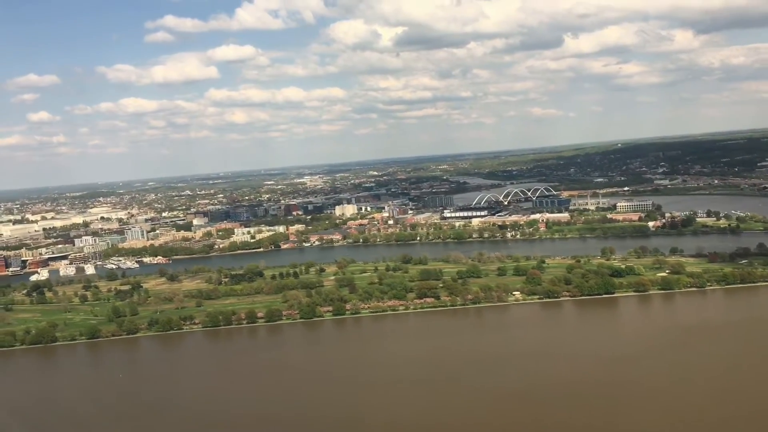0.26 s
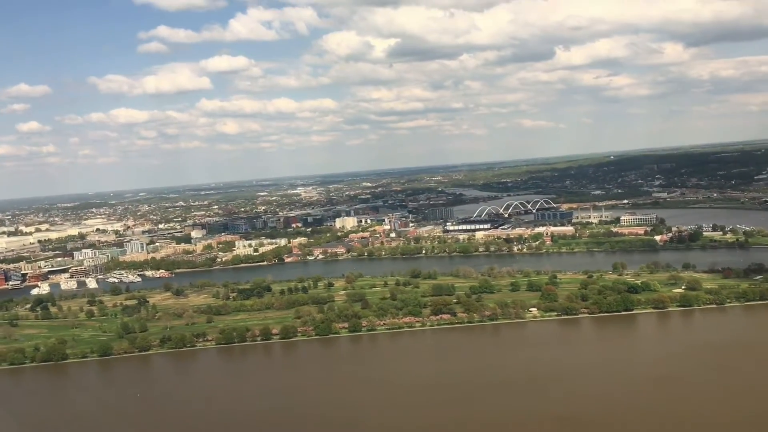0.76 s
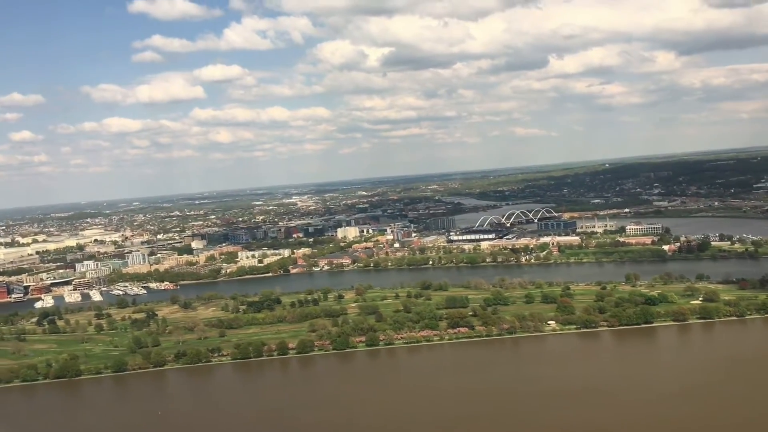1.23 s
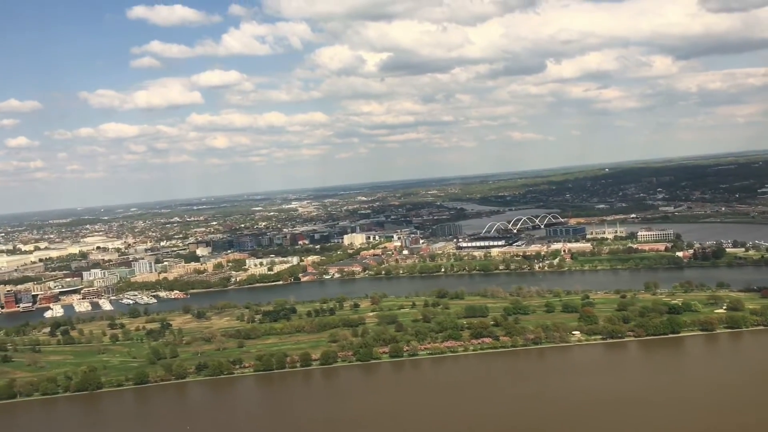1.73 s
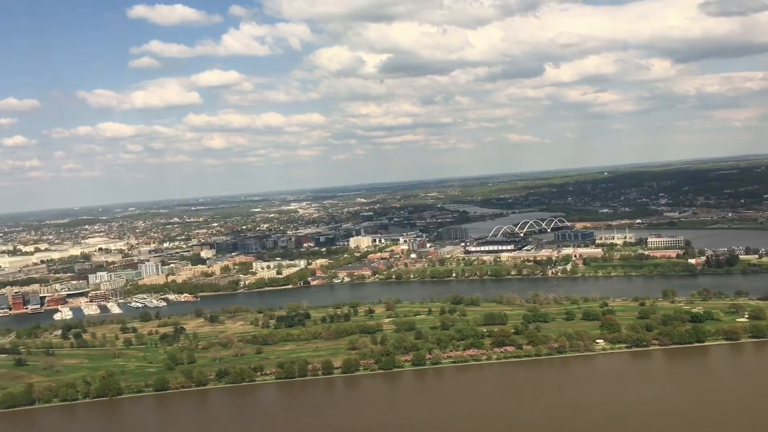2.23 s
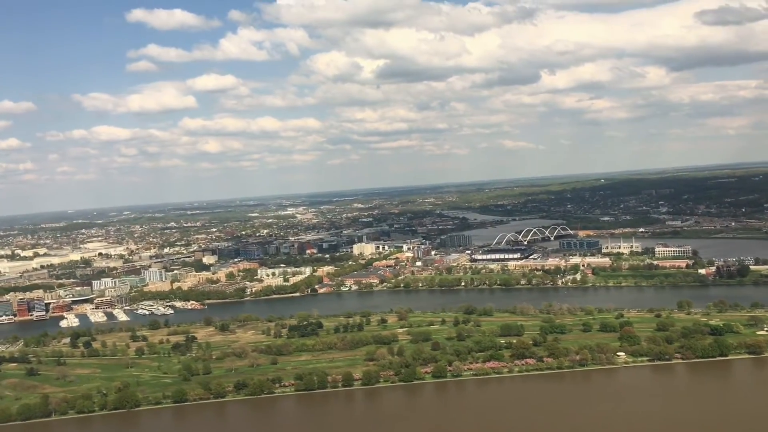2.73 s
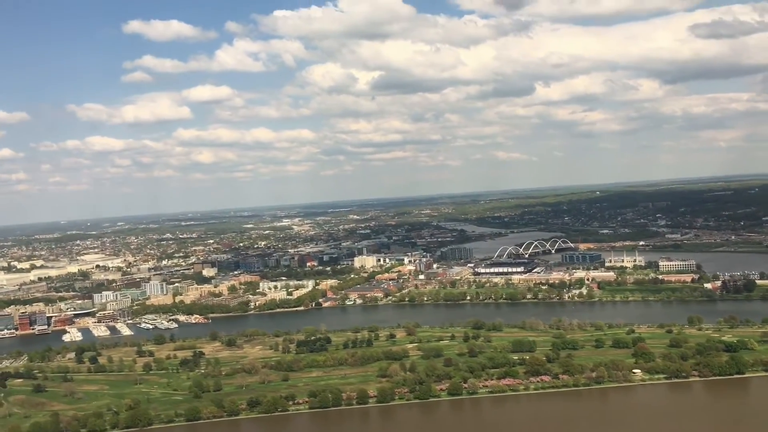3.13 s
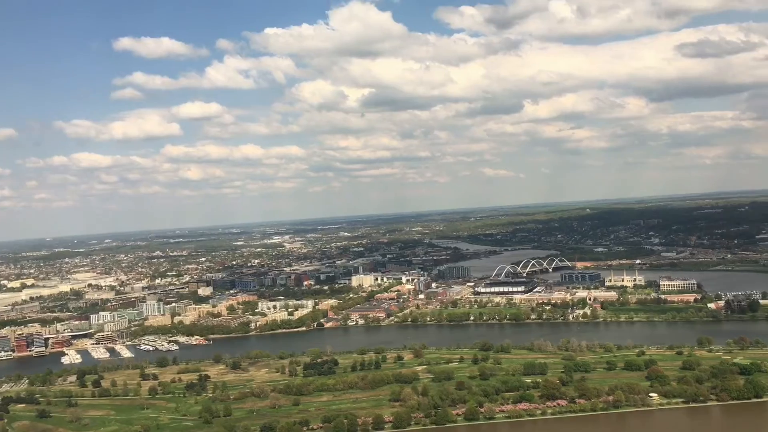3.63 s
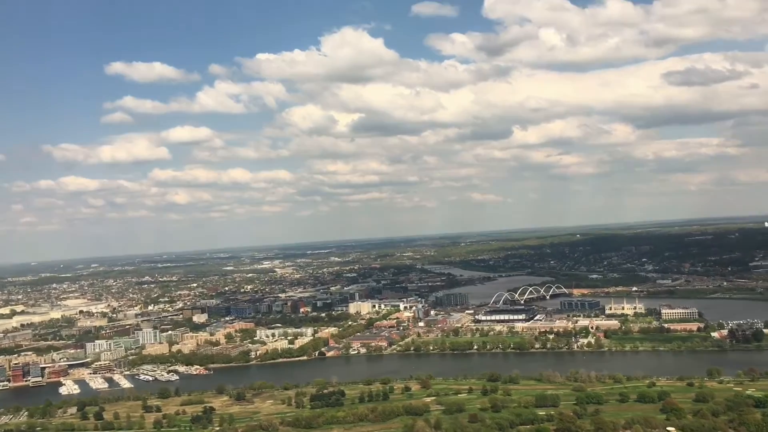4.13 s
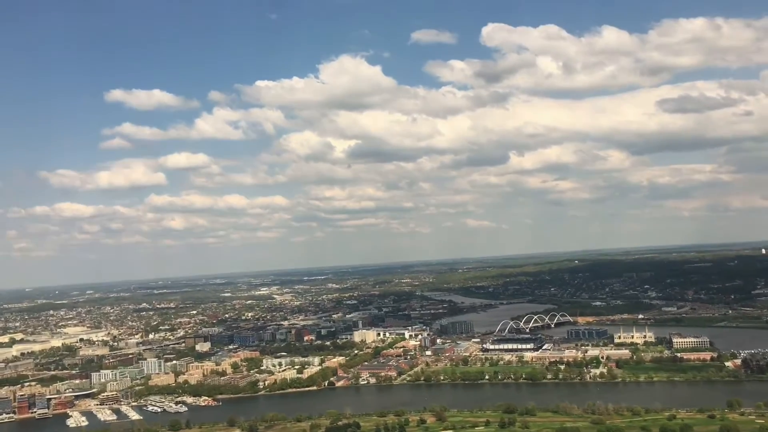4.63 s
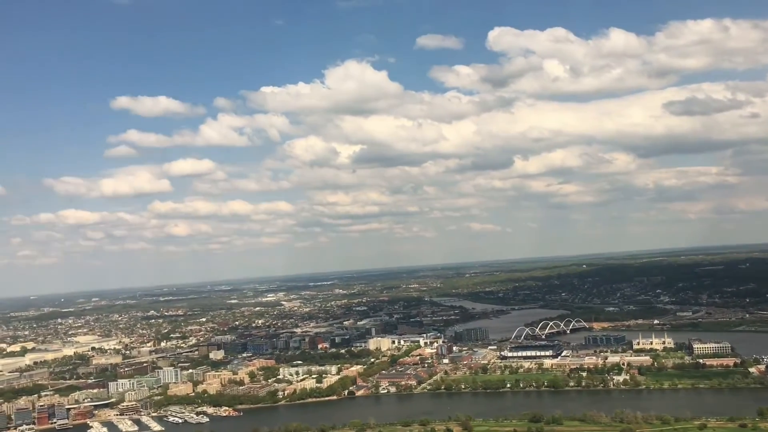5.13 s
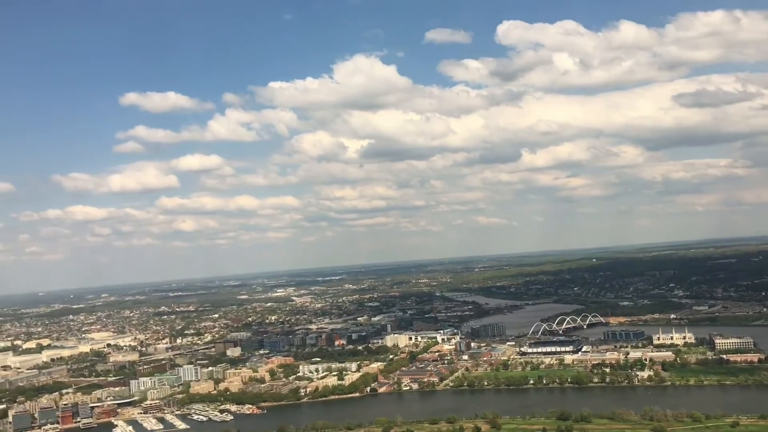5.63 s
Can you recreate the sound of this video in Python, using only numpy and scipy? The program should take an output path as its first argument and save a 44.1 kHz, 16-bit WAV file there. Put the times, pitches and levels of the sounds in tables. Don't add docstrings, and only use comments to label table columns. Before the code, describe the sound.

The inside of a jet airliner climbing at high power, captured by a phone held close to the window, high above a river and town. From 0 to nearly 6 seconds a heavy low rumble never stops; its boom and drone flutter in quick irregular surges and lulls. The cabin wall drums above it, with a dull, muffled roar of air and a much thinner hiss. A steady-pitched engine buzz, a coarse comb of low tones with faint higher ones, runs throughout, its parts fading in and out. Faint pump and duct whines and a throbbing window panel sit beneath. Airflow rises slightly at about 2 to 2.5 seconds and again near 5. Small, dry scuffs of a hand on the phone cluster around 2.0-2.3 seconds, come singly near 3.4, 3.7 and 4.2, then return at 4.9 and 5.2-5.4. The roar continues to the end.

```python
import sys
import numpy as np
from scipy import signal
from scipy.fft import rfft, irfft
from scipy.io import wavfile
from scipy.ndimage import uniform_filter1d

SR = 44100
rng = np.random.default_rng(int(sys.argv[2]) if len(sys.argv) > 2 else 0)


def convert_level_to_amplitude(level_db):
    exponent = np.asarray(level_db, float) / 20
    return 10 ** exponent


def store_pcm(level_fs):
    pcm = np.round(np.clip(level_fs, -1, 1) * 32767).astype(np.int16)
    wavfile.write(sys.argv[1], SR, np.atleast_2d(pcm).T)


N = 258426
SLOW_RATE = 50


def evened(x):
    return x / np.sqrt(np.mean(abs(x) ** 2) + 1e-20)


def curve(rows):
    times, values = np.transpose(rows)
    return np.interp(np.arange(N) / SR, times, values)


def noise(colour, size, patchy_db, flicker_db):
    frames = 4 * N // size + 5
    hz = np.fft.rfftfreq(size, 1 / SR)
    a, b, patches = rng.standard_normal((frames, len(hz), 3)).T
    patches = uniform_filter1d(patches, size=10, axis=0)
    patches = evened(uniform_filter1d(patches, size=20, axis=1))
    flicker = evened(uniform_filter1d(rng.standard_normal(frames), size=8))
    f, db = np.transpose(colour)
    shape_db = np.interp(np.log(hz + 1), np.log(f + 1), db, left=-120, right=-120)
    z = (a + 1j * b) * convert_level_to_amplitude(shape_db[:, None] + patchy_db * patches + flicker_db * flicker)
    sound = signal.istft(z, nperseg=size, noverlap=3 * size // 4)[1]
    return evened(sound[:N])


def surges(rest_db, rows, depth):
    t = np.arange(0, N, 64) / SR
    change_db = sum(db * np.exp(-((t - s) / half) ** 2) for s, half, db in rows)
    return np.interp(np.arange(N) / SR, t, convert_level_to_amplitude(rest_db + depth * change_db))


def calmed(x, size, share):
    power = evened(x) ** 2
    lumps = uniform_filter1d(uniform_filter1d(power, size=size), size=size)
    return evened(x / (abs(lumps) + .02) ** (share / 2))


# (frequency [Hz], level [dB per Hz])
RUMBLE_COLOUR = [(14, -61), (22, -32.5), (40, -5.5), (54, -3), (70, 5), (82, 1.5), (92, -3), (112, -1.5),
                 (135, -4.5), (155, -1), (175, -5.5), (192, -5.5), (215, -14), (260, -38.5)]
# (centre [s], half length [s], change [dB])
BOOM_SURGES = [(0.005, 0.025, 0), (0.095, 0.02, 4), (0.15, 0.03, -6.0), (0.26, 0.02, -11),
               (0.387, 0.05, 3.5), (0.474, 0.02, -4.5), (0.504, 0.02, 1), (0.589, 0.03, -5.0),
               (0.708, 0.023, -4.5), (0.753, 0.019, 6.5), (0.878, 0.05, -7.5), (1.106, 0.023, -11),
               (1.163, 0.015, 8), (1.325, 0.017, 5.5), (1.362, 0.02, -8), (1.472, 0.02, 1),
               (1.541, 0.03, 0), (1.643, 0.024, 5.5), (1.681, 0.02, -6), (1.771, 0.03, -13),
               (1.866, 0.02, 4.5), (2.028, 0.062, -5.0), (2.334, 0.035, 7), (2.565, 0.083, 2.5),
               (2.687, 0.03, -1.5), (2.798, 0.02, -9), (2.83, 0.02, 4.5), (2.873, 0.02, -9),
               (2.938, 0.02, 1.5), (2.973, 0.022, -4), (3.026, 0.02, 3.5), (3.128, 0.038, 1.5),
               (3.18, 0.023, -4), (3.282, 0.017, -6), (3.442, 0.019, 4.0), (3.507, 0.02, -4.5),
               (3.638, 0.032, -11), (3.771, 0.02, -7), (3.816, 0.02, 1), (3.907, 0.018, 2.5),
               (4.156, 0.03, -5), (4.255, 0.045, 5), (4.38, 0.02, 4.0), (4.43, 0.02, -7),
               (4.585, 0.018, 2.5), (4.649, 0.018, 5.5), (4.709, 0.035, -4), (4.774, 0.015, 6.5),
               (4.877, 0.02, 1.5), (4.913, 0.017, -3), (5.013, 0.013, 11.5), (5.133, 0.075, -7),
               (5.366, 0.03, -7), (5.478, 0.02, -9), (5.52, 0.022, 6), (5.816, 0.058, 4.5)]
# (centre [s], half length [s], change [dB])
DRONE_SURGES = [(0.01, 0.016, -4.5), (0.229, 0.02, 3.5), (0.349, 0.018, -2.5), (0.455, 0.02, -5),
                (0.5, 0.02, 4), (0.692, 0.02, -6.5), (0.84, 0.087, 2.5), (1.043, 0.027, 4.5),
                (1.122, 0.018, -3), (1.187, 0.033, -7), (1.272, 0.02, 3), (1.352, 0.039, -4),
                (1.467, 0.02, 3.5), (1.502, 0.02, -3.0), (1.63, 0.2, 2.0), (1.666, 0.016, -9),
                (1.792, 0.014, -9), (1.932, 0.02, -5), (2.09, 0.017, -5), (2.16, 0.015, -6.5),
                (2.28, 0.06, 2.5), (2.42, 0.026, 3), (2.484, 0.018, -2.5), (2.528, 0.021, 5.0),
                (2.562, 0.02, -8), (2.597, 0.024, 2), (2.644, 0.018, -3.5), (2.824, 0.077, 3),
                (2.895, 0.024, 4), (2.94, 0.02, -4.5), (3.013, 0.089, -3), (3.108, 0.017, 4),
                (3.342, 0.015, 4.5), (3.486, 0.036, -3), (3.732, 0.032, 3.5), (3.831, 0.019, 3.5),
                (3.936, 0.07, -2), (4.071, 0.04, 3.5), (4.172, 0.02, -2), (4.365, 0.02, 3),
                (4.394, 0.02, -7), (4.425, 0.054, -4), (4.718, 0.056, -3.5), (4.776, 0.017, 4),
                (4.799, 0.013, -6), (4.909, 0.025, -3), (5.004, 0.015, 3.5), (5.148, 0.018, -4.5),
                (5.187, 0.016, 4), (5.23, 0.03, -3), (5.286, 0.017, 5.5), (5.315, 0.014, -7),
                (5.347, 0.019, 5), (5.438, 0.027, 4), (5.483, 0.017, -4), (5.779, 0.02, 4.5)]
BOOM_REST_DB, DRONE_REST_DB = -17.5, -16.5


def rumble():
    low = noise(RUMBLE_COLOUR, size=8192, patchy_db=0.54, flicker_db=-2)
    boom_share = 1 / (1 + (np.fft.rfftfreq(N, 1 / SR) / 100) ** 12)
    boom = irfft(rfft(low) * boom_share, N)
    drone = calmed(low - boom, size=1400, share=0.93)
    boom = calmed(boom, size=1600, share=0.72)
    return (surges(BOOM_REST_DB, BOOM_SURGES, depth=1.27) * boom
            + surges(DRONE_REST_DB, DRONE_SURGES, depth=1.21) * drone)


# (frequency [Hz], level [dB per Hz])
DRUM_COLOUR = [(170, -34), (225, -3), (270, -1.5), (310, -8), (350, -5.5), (380, -11.5), (460, -10.5),
               (540, -49)]
# (centre [s], half length [s], change [dB])
DRUM_SURGES = [(0.246, 0.07, -4.5), (0.386, 0.015, 7), (0.72, 0.018, 0.5), (0.883, 0.02, 7),
               (0.938, 0.02, -8), (1.028, 0.02, -3.5), (1.088, 0.02, 2.5), (1.357, 0.045, -3),
               (1.468, 0.025, -7), (1.59, 0.017, -1), (1.655, 0.02, -3.5), (1.751, 0.022, 2),
               (2.093, 0.041, 6), (2.19, 0.02, 4), (2.275, 0.035, 4.5), (2.424, 0.03, 0),
               (2.614, 0.12, 2.5), (2.807, 0.045, -5), (2.957, 0.049, -4.5), (3.218, 0.027, -10),
               (3.298, 0.02, -4.0), (3.497, 0.02, -6), (3.57, 0.02, 4.0), (3.655, 0.03, -2.5),
               (3.796, 0.045, 0.5), (3.871, 0.037, 6.5), (3.951, 0.037, -4), (4.066, 0.026, -1),
               (4.174, 0.015, -3), (4.285, 0.022, -7), (4.34, 0.02, -2), (4.525, 0.017, 1),
               (4.81, 0.03, 3.5), (4.898, 0.02, 4.5), (4.994, 0.02, -7), (5.066, 0.033, 3.5),
               (5.192, 0.05, 2.5), (5.498, 0.02, -2), (5.642, 0.1, 2.0), (5.812, 0.033, -2.5)]
DRUM_REST_DB = -28.5


def wall_drumming():
    drum = noise(DRUM_COLOUR, size=4096, patchy_db=.5, flicker_db=-0.4)
    drum = calmed(drum, size=1600, share=0.43)
    return surges(DRUM_REST_DB, DRUM_SURGES, depth=0.73) * drum


# (time [s],
# level [dB])
NEARNESS = [(0.0, -0.5), (0.4, 0), (1.2, -0.5), (1.85, .5), (2.05, 2), (2.2, 2.5), (2.55, 2), (2.95, 0),
            (3.5, 1), (4.0, 1.5), (4.4, 1), (4.75, 1.5), (4.92, 3), (5.08, 2.5), (5.4, 2), (5.86, 1.5)]
# (frequency [Hz], level [dB per Hz])
ROAR_COLOUR = [(380, -27), (480, 2.5), (540, 1.5), (620, -4), (730, -8), (820, -4.5), (900, -8),
               (1050, -11.5), (1300, -12.5), (1500, -19.5), (1800, -15), (2150, -20), (2600, -52)]
# (frequency [Hz], level [dB per Hz])
HISS_COLOUR = [(1700, -16), (2300, -0.5), (2900, -3.5), (3200, -2), (4300, -5), (4800, -11.5), (6100, -7),
               (7000, -12), (7700, -16), (9900, -16), (10300, -23), (10800, -21.5), (11200, -18.5),
               (13500, -23.5), (15000, -26), (15800, -32)]
ROAR_DB, HISS_DB, HISS_FOLLOWS = -36.5, -50, 1


def airflow():
    near_db = curve(NEARNESS)
    roar = noise(ROAR_COLOUR, size=4096, patchy_db=.7, flicker_db=.2)
    hiss = noise(HISS_COLOUR, size=1024, patchy_db=.9, flicker_db=.15)
    return convert_level_to_amplitude(ROAR_DB + near_db) * roar + convert_level_to_amplitude(HISS_DB + HISS_FOLLOWS * near_db) * hiss


def ring(hz, width_hz):
    r = np.exp(-np.pi * width_hz / SR)
    kicks = rng.standard_normal(N) + 1j * rng.standard_normal(N)
    slow = signal.lfilter([1], [1, -2 * r, r * r], kicks)
    return evened((slow * np.exp(2j * np.pi * hz * np.arange(N) / SR)).real)


# (frequency [Hz], width [Hz], level [dB])
WHINES = [
    (1725, 24, -58),
    (2250, 16, -60),
    (2706, 10, -64),
    (2785, 20, -69),
    (1028, 10, -59),
    (3075, 70, -66),
    (6130, 40, -71),
    (8850, 260, -69),
    (266, 14, -37),
    (219, 8, -35),
]
# (centre [s], half length [s], change [dB])
PANEL_THROBS = [(0.1, 0.15, -6), (0.299, 0.033, 5.5), (0.544, 0.045, -4.0), (0.659, 0.045, 5.5),
                (0.943, 0.07, -5), (1.142, 0.03, -5), (1.277, 0.03, 4), (1.432, 0.07, -7),
                (1.711, 0.085, -8), (2.055, 0.045, 3), (2.145, 0.03, -3.0), (2.2, 0.25, 3.0),
                (2.24, 0.03, 5), (2.36, 0.1, -1.5), (2.509, 0.045, 3.0), (2.639, 0.03, 4),
                (2.868, 0.07, -3.0), (3.198, 0.025, 6), (3.312, 0.03, 1.5), (3.387, 0.03, -5.0),
                (3.771, 0.045, -3), (3.931, 0.033, 8), (4.041, 0.02, 7), (4.375, 0.092, -5),
                (4.754, 0.03, 3.5), (5.153, 0.03, -6), (5.293, 0.03, -7), (5.413, 0.045, 4.0),
                (5.527, 0.02, -6.5), (5.617, 0.25, 4)]
PANEL_HZ, PANEL_WIDTH_HZ, PANEL_DB, PANEL_DEPTH = 1206, 24.6, -49.5, 1.34


def whines():
    panel = calmed(ring(PANEL_HZ, PANEL_WIDTH_HZ), size=1500, share=0.87)
    panel = surges(PANEL_DB, PANEL_THROBS, PANEL_DEPTH) * panel
    return panel + sum(convert_level_to_amplitude(db) * ring(hz, width_hz) for hz, width_hz, db in WHINES)


# (time [s], peak level [dB], 60 dB decay time [s])
SLIPS = [(2.0194, -55, 0.13), (2.1011, -52.5, 0.14), (2.141, -50.5, 0.15), (2.156, -52, 0.2),
         (2.2094, -60, 0.15), (2.269, -57, 0.15), (3.3794, -54.5, 0.13), (3.7194, -52.5, 0.17),
         (4.2094, -52, 0.18), (4.8794, -55, 0.15), (4.9094, -59, 0.25), (4.945, -59, 0.2),
         (5.232, -54, 0.15), (5.3014, -54.5, 0.19), (5.3742, -46.5, 0.08), (5.41, -51, 0.14)]
# (frequency [Hz], level [dB per Hz])
SLIP_COLOUR = [(300, -13), (1000, -0.5), (3000, -3), (6000, -13), (9000, -14.5), (12000, -21.5),
               (16000, -24)]


def hand():
    t, power = np.arange(N) / SR, np.zeros(N)
    for s, db, t60 in SLIPS:
        age = np.maximum(t - s + 0.005, 0)
        rise = 1 - np.exp(-age / 0.0044)
        power += (convert_level_to_amplitude(db - 60 * age / t60) * rise) ** 2
    scuff = noise(SLIP_COLOUR, size=256, patchy_db=1, flicker_db=.4)
    roughness = evened(uniform_filter1d(rng.standard_normal(N), size=60))
    catch = evened(convert_level_to_amplitude(1.8 * roughness))
    return convert_level_to_amplitude(12.5) * np.sqrt(power) * scuff * catch


def drift(rate_hz, count):
    size = N * SLOW_RATE // SR + 2
    hz = np.fft.fftfreq(size, 1 / SLOW_RATE)
    z = rng.standard_normal((count, size)) + 1j * rng.standard_normal((count, size))
    z = np.fft.ifft(z * np.exp(-(hz / np.reshape(rate_hz, (-1, 1))) ** 2))
    return z / np.sqrt(np.mean(abs(z) ** 2, axis=1, keepdims=True))


def spread(slow):
    at, points = np.arange(N) * SLOW_RATE / SR, np.arange(len(slow))
    return np.interp(at, points, slow.real) + 1j * np.interp(at, points, slow.imag)


# (time [s], frequency [Hz])
SHAFT = [(0.0, 109.564), (0.49, 109.62), (0.98, 109.619), (1.46, 109.47), (1.95, 109.56), (2.44, 109.637),
         (2.93, 109.614), (3.42, 109.576), (3.91, 109.714), (4.4, 109.658), (4.88, 109.662),
         (5.37, 109.683), (5.86, 109.673)]
ORDER_DB = [-34.5, -38, -33, -41.5, -51, -55, -60, -57, -55, -62, -57, -70, -67, -69, -54, -73, -63, -75,
            -83, -66, -68, -67, -66, -82, -65, -56, -69, -72, -70, -71, -62, -77, -68, -64, -64, -69, -68,
            -69, -65, -74, -84, -79, -73, -72, -78, -79, -79, -77, -73, -73, -80, -78, -73, -67, -74, -78,
            -77, -83, -76, -79, -80, -79, -80, -90, -82, -80, -87, -90, -85, -87, -83, -86, -84, -85, -89,
            -84, -83, -82, -81, -93, -83, -83, -88, -89, -88, -89, -84, -85, -87, -93]
# (order, centre [s], half length [s], change [dB])
SWELLS = [(3, 4.0, 1.3, -11.3), (4, 3.2, 0.9, 3.8), (4, 5.8, 0.6, -8.3), (5, 0.9, 1.0, -4.5),
          (5, 3.45, 1.0, -9.5), (6, 3.5, 0.8, -10.7), (6, 5.2, 0.7, 3), (7, 5.2, 0.6, 4.5),
          (8, 5.4, 0.6, 6.0), (10, 4.4, 0.35, 4), (22, 1.6, 0.6, 7.5), (22, 4.4, 0.6, 10.2),
          (27, 1.3, 0.6, -10.3), (32, 2.9, 1.3, 5.7), (32, 5.5, 0.25, 10.9), (33, 3.3, 0.4, -10.2),
          (35, 1.5, 0.4, 8.4), (35, 4.3, 0.4, -13.4), (35, 4.3, 0.6, 21.8), (36, 2.2, 0.15, 7.2),
          (39, 3.4, 0.25, -9.9), (39, 3.4, 0.9, 7.6), (40, 1.7, 0.4, 8.7), (40, 4.4, 0.9, 6.7),
          (41, 3.2, 0.4, -8.7), (45, 1.0, 0.9, 7.2), (65, 5.6, 0.6, 7.3), (73, 2.8, 0.25, 11.0),
          (73, 5.5, 0.15, 13.0), (84, 5.8, 0.9, 10.6)]
# (order, centre [s], half length [s], change [dB])
FURTHER_SWELLS = [(3, 1.3, .2, -5), (3, 2.2, .35, 3), (4, 1.1, .3, 2.5), (4, 1.8, .25, -2), (4, .05, .2, -8),
                  (17, 3.5, .6, 3), (17, 2.2, .3, -3), (36, 4.2, .3, -8), (37, 2.1, .35, -6),
                  (56, 3.5, .2, -8), (7, 2.0, .2, -6), (7, 3.5, .5, -4), (5, 2.15, .25, 2), (6, .1, .5, -6),
                  (6, 2.5, .2, 3), (7, 2.43, .2, 4), (13, 4.97, .27, 5), (17, 5.7, .35, 4),
                  (25, 2.25, .12, 7), (33, 2.3, .12, 4), (91, 1.3, .3, 9), (36, 4.8, .3, 5.5),
                  (36, 3.5, .5, -5), (37, 3.4, .5, 3), (37, 4.4, .12, 5), (38, 4.2, .6, -6),
                  (68, 2.85, .35, 8), (65, 2.85, .3, 8), (41, 3.9, .15, 2), (46, 5.3, .4, 4),
                  (55, 4.1, .15, 6), (56, .7, 1.2, 3), (56, 5.2, .8, -7), (89, 4.17, .12, 12),
                  (90, 4.1, .2, 10), (90, 5.75, .15, 10)]
# (order, centre [s], half length [s], change [dB])
PASSING_SWELLS = [(13, 3.72, 0.6, -4.5), (19, 2.4, 0.4, -5.5), (19, 5.4, 0.15, 8.5), (24, 2.36, 0.25, 7.0),
                  (27, 0.36, 0.15, -7.0), (27, 5.72, 0.4, 5.0), (29, 0.32, 0.4, 6.5), (29, 1.24, 0.4, -5.5),
                  (29, 2.24, 0.25, 7.5), (31, 2.12, 0.15, 8.0), (31, 3.2, 0.25, 7.5), (32, 2.8, 0.25, -6.5),
                  (33, 4.72, 0.15, -8.0), (35, 0.92, 0.15, 10.0), (35, 5.48, 0.4, -4.5),
                  (36, 0.24, 0.15, -7.0), (39, 1.2, 0.15, -9.0), (39, 2.8, 0.25, 7.5),
                  (41, 0.52, 0.6, -6.0), (41, 1.6, 0.25, 9.5), (42, 2.44, 0.15, 10.0),
                  (42, 2.84, 0.15, -9.0), (44, 3.84, 0.15, 7.5), (45, 2.08, 0.15, -8.5),
                  (46, 3.8, 0.25, 9.0), (46, 4.48, 0.25, -9.0), (51, 1.44, 0.6, -5.5), (51, 4.8, 0.15, 8.0),
                  (52, 0.12, 0.15, 8.0), (52, 1.52, 0.25, 9.5), (55, 4.52, 0.25, -7.0),
                  (55, 5.68, 0.25, 7.5), (56, 3.32, 0.25, -9.0), (57, 5.68, 0.15, 7.5),
                  (61, 0.32, 0.15, 10.0), (61, 2.52, 0.15, -8.0), (61, 4.52, 0.25, 8.5),
                  (64, 3.04, 0.25, 6.0), (65, 3.0, 0.25, -8.5), (68, 2.96, 0.6, -4.5), (68, 4.2, 0.4, -6.0),
                  (68, 4.88, 0.15, 10.0), (75, 0.16, 0.15, 10.0), (95, 4.88, 0.15, -8.5),
                  (96, 0.4, 0.4, 7.0), (99, 0.44, 0.4, 7.5)]
# (time [s], level [dB])
BLADE = [(0.0, -68), (0.45, -63), (0.75, -58), (1.5, -53.5), (1.72, -64), (1.97, -55), (2.2, -60),
         (2.37, -56), (2.44, -48), (2.68, -52), (3.05, -60), (3.4, -57), (3.8, -58), (4.0, -60),
         (4.17, -49.5), (4.3, -62), (4.65, -51), (5.05, -52.5), (5.22, -60), (5.38, -53), (5.5, -65),
         (5.86, -56)]
FIRST_ORDER, BLADE_ORDER = 3, 28


def buzz_saw():
    shaft = np.exp(2j * np.pi * np.cumsum(curve(SHAFT)) / SR)
    rest_db = ORDER_DB + [-94] * 14
    orders = FIRST_ORDER + np.arange(len(rest_db))
    fades = drift(.4 + .05 * orders, count=len(orders))
    flutter = drift(4 + .2 * orders, count=len(orders))
    start = np.exp(2j * np.pi * rng.random(len(orders)))
    t = np.arange(fades.shape[1]) / SLOW_RATE
    level_db = np.reshape(rest_db, (-1, 1)) + 0 * t
    steady = np.where(np.isin(orders, (3, 4, 5, 6, 7, 17, BLADE_ORDER)), 5, .9)
    for k, s, half, db in SWELLS + FURTHER_SWELLS + PASSING_SWELLS:
        level_db[int(k) - FIRST_ORDER] += db * np.exp(-((t - s) / half) ** 4)
    for k, s, half, db in SWELLS + FURTHER_SWELLS:
        row = int(k) - FIRST_ORDER
        steady[row] = max(steady[row], 2.6)
    level_db[BLADE_ORDER - FIRST_ORDER] = np.interp(t, *np.transpose(BLADE))
    fades[BLADE_ORDER - FIRST_ORDER] = 0
    out, turn = np.zeros(N), shaft ** (FIRST_ORDER - 1)
    for k, db, firm, fade, phase in zip(orders, level_db, steady, fades + .7 * flutter, start):
        turn = turn * shaft
        slow = convert_level_to_amplitude(db - 0.77 + 0.041 * k) * phase * evened(firm + fade)
        out += np.sqrt(2) * (spread(slow) * turn).real
    return out


def scene():
    return (rumble() + wall_drumming() + airflow() + whines() + hand() + buzz_saw())[None]


def band_limit(x):
    return signal.sosfilt(signal.butter(12, 15700, fs=SR, output="sos"), x)


def record(dry):
    closing = np.minimum(.2 + (N - np.arange(N)) / 120, 1)
    over = np.maximum(abs(dry) - .92, 0)
    limited = dry - np.sign(dry) * (over - .2 * np.tanh(over / .2))
    return band_limit(limited * closing)


dry = scene()
out = record(dry)
store_pcm(out)
```